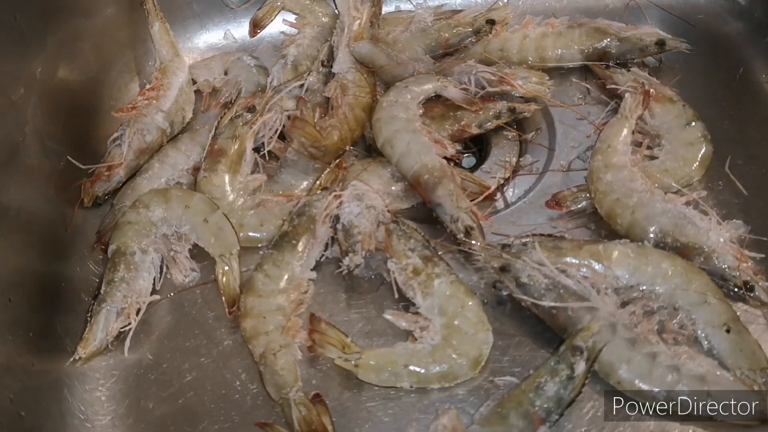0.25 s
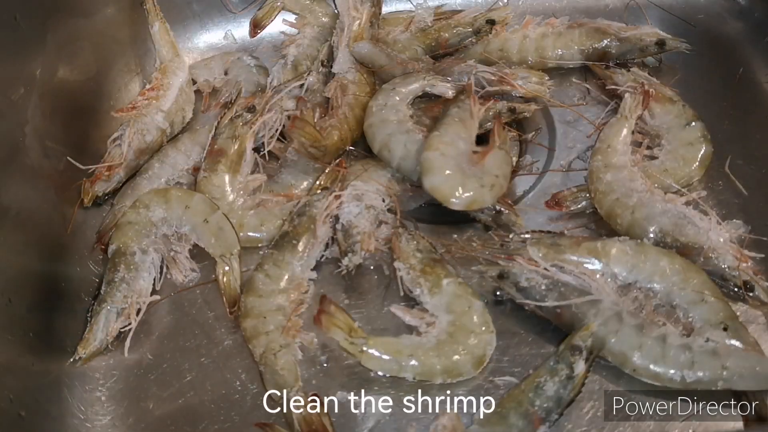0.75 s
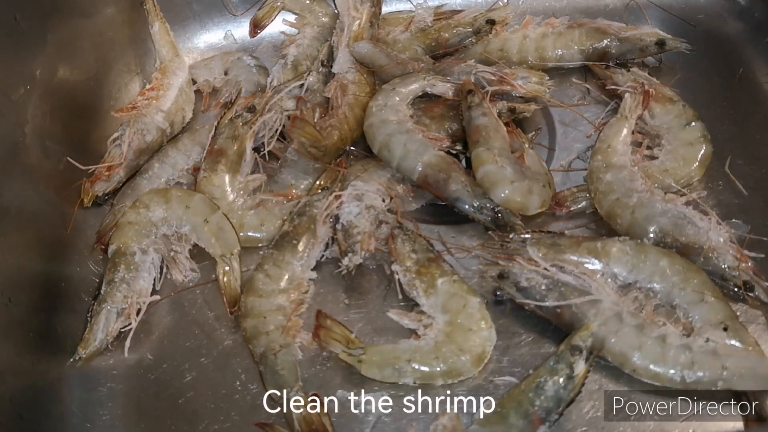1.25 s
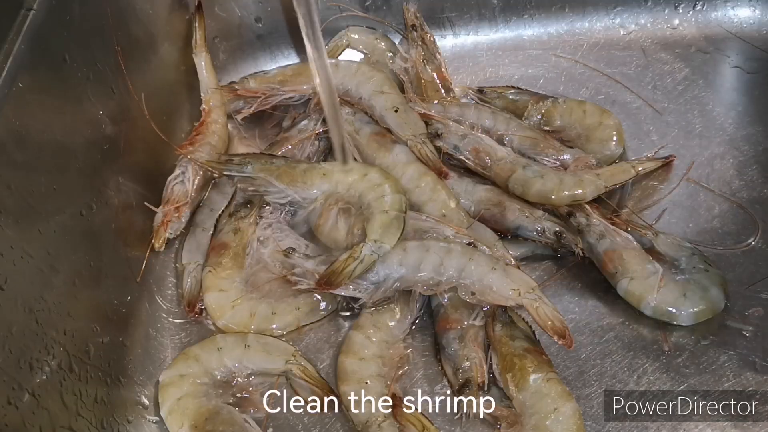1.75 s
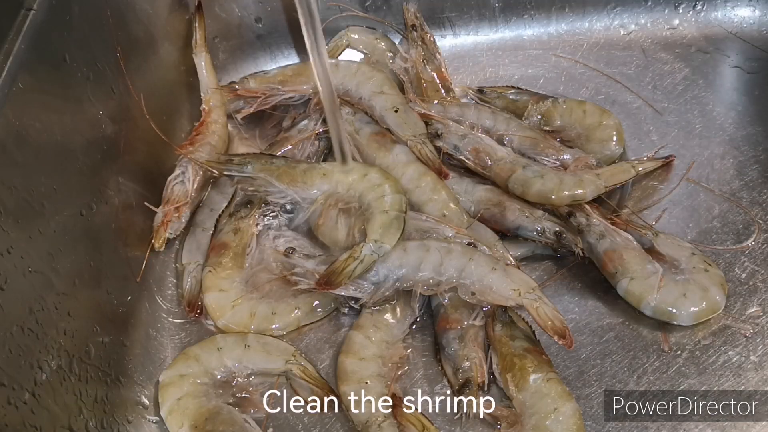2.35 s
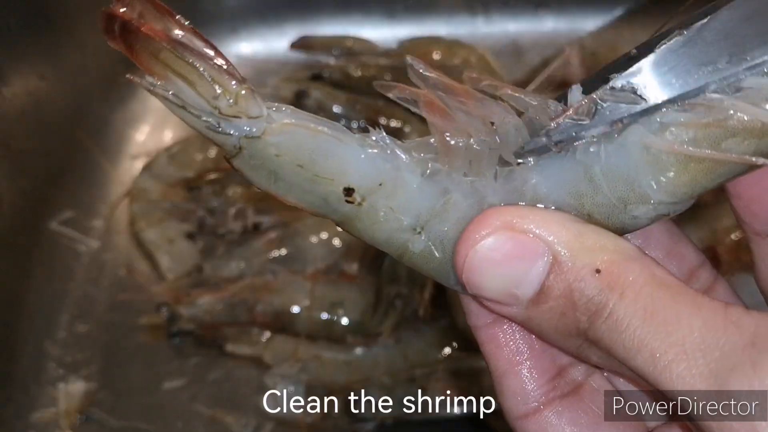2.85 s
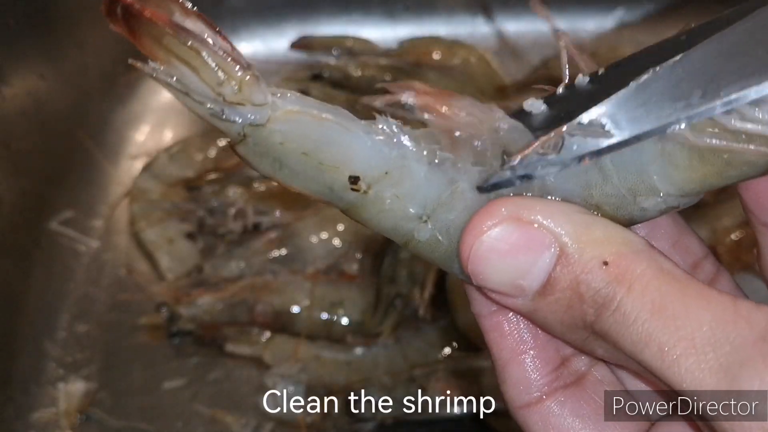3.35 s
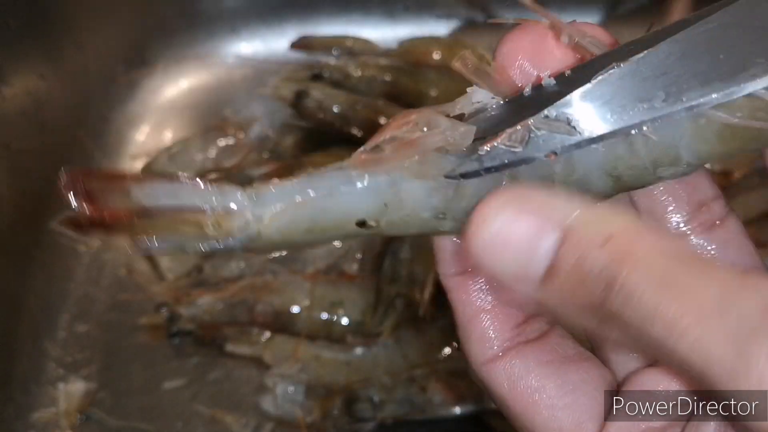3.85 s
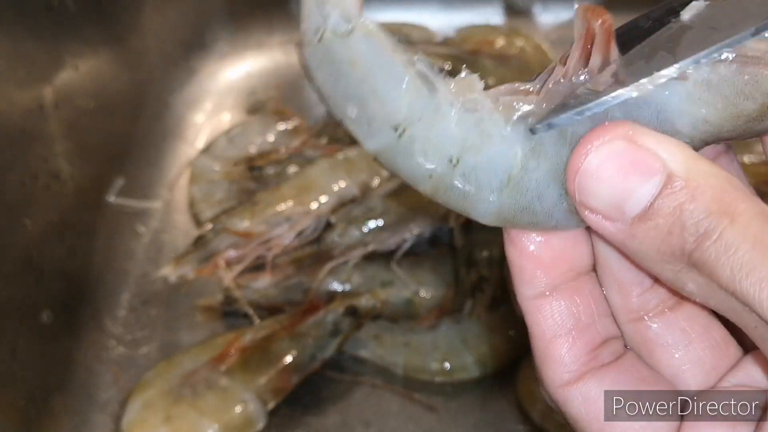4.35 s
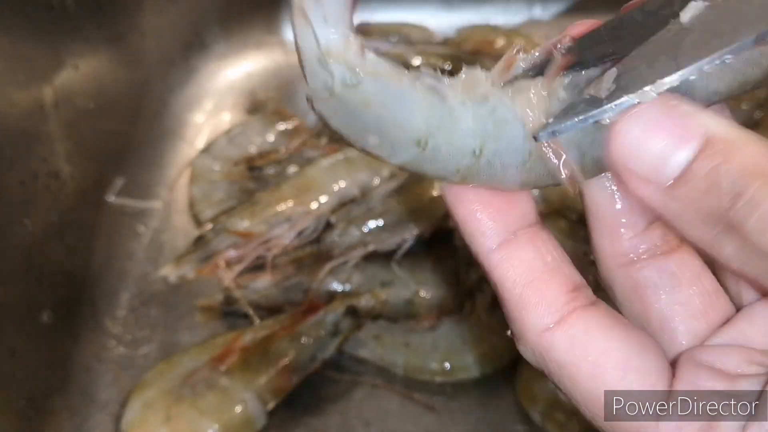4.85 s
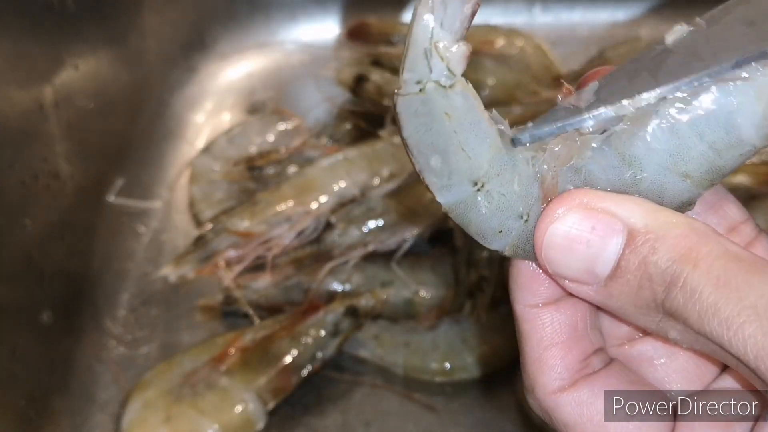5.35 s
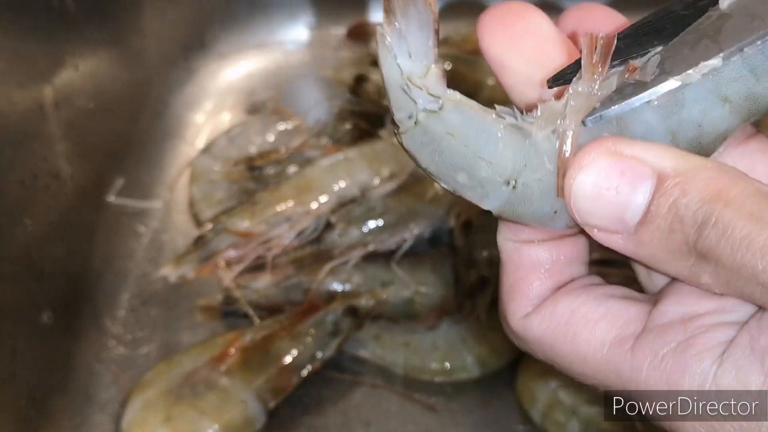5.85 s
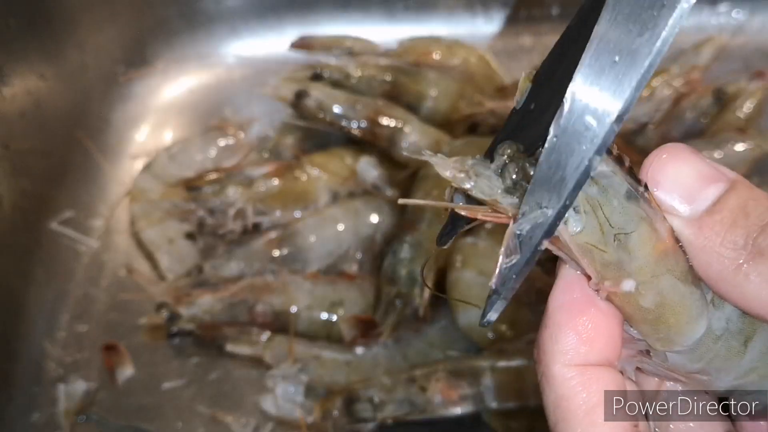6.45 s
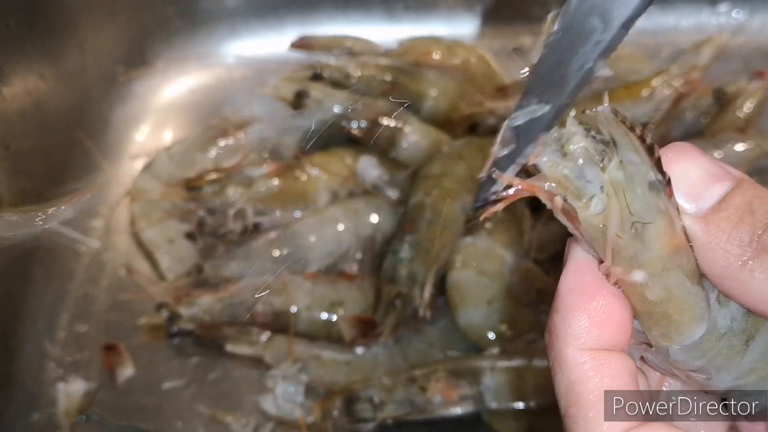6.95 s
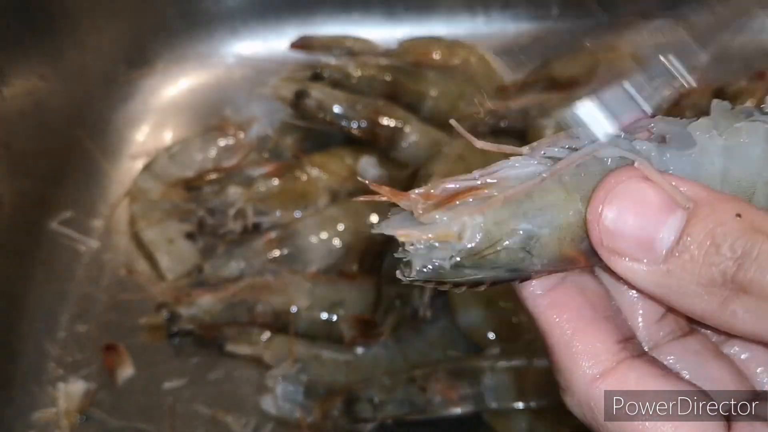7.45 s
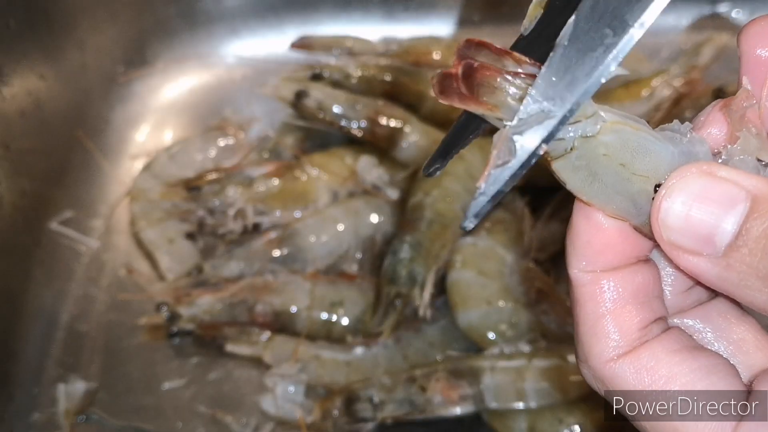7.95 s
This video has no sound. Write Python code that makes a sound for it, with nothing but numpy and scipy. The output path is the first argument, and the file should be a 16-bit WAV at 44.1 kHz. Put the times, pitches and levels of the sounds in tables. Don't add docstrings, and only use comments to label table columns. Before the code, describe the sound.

Close stereo sound at a steel basin: crisp wet scrabbling, a loud hollow flop, a few drips and renewed rustling. Then a steady bright rush of running water with bubbling and low drumming, stopping suddenly. Afterwards, over a faint hum and motor drone, come isolated hard scissor cuts, small crackles and light ticks, the last cut bright and loud, followed by scraps dropping softly.

```python
import sys
import numpy as np
from scipy import signal
from scipy.fft import rfft, irfft, next_fast_len
from scipy.io import wavfile

SR = 44100
rng = np.random.default_rng(int(sys.argv[2]) if len(sys.argv) > 2 else 0)


def put_to_file(sound):
    columns = np.atleast_2d(sound).T
    safe = np.clip(columns, -1, 1)
    whole_steps = np.round(safe * 32767)
    wavfile.write(sys.argv[1], SR, whole_steps.astype(np.int16))


def rack_gain(trim_db):
    fader = np.asarray(trim_db, float)
    return 10 ** (fader / 20)


N = 361179


def rms_one(x):
    return x / np.sqrt(np.mean(x ** 2) + 1e-20)


def level(x):
    return x / np.sqrt(np.mean(x.mean(axis=0) ** 2) + 1e-20)


def in_time(rows):
    s, *columns = np.transpose(rows)
    t = np.arange(N) / SR
    gate = (t >= s[0]) & (t < s[-1])
    return [np.interp(t, s, column) for column in columns] + [gate]


def at_hz(points, hz):
    points = np.array(points)
    return np.interp(np.log(hz), np.log(points[:, 0]), points[:, 1])


def colour(x, spectrum, pan=((1, 0), (2, 0))):
    length = x.shape[-1]
    size = next_fast_len(length)
    hz = np.fft.rfftfreq(size, 1 / SR) + 1
    gain_db = at_hz(spectrum, hz) + at_hz(pan, hz) * [[.5], [-.5]]
    return irfft(rfft(x, size) * rack_gain(gain_db), size)[:, :length]


def drift(rate_hz):
    r = np.exp(-2 * np.pi * rate_hz * 40 / SR)
    white = rng.standard_normal(N // 40 + 2002)
    slow = signal.lfilter([1], [1, -2 * r, r * r], white)[2000:]
    return np.interp(np.arange(N) / 40, np.arange(len(slow)), rms_one(slow))


def resonate(x, hz, width_hz):
    r = np.exp(-np.pi * width_hz / SR)
    ring = [1, -2 * r * np.cos(2 * np.pi * hz / SR), r * r]
    return signal.lfilter(np.array([1, 0, -1]) * (1 - r * r) / 2, ring, x)


def room_noise(least_alike=-.99, left_lag=0):
    # pitch in Hz, likeness of left and right (1 = the same).
    likeness = [(60, 1), (130, 0.98), (290, 0.98), (640, -0.19), (1410, 0.21), (3100, -0.045),
                (6820, -0.19), (15000, -0.04)]
    size = next_fast_len(N)
    alike = np.clip(at_hz(likeness, np.fft.rfftfreq(size, 1 / SR) + 1), least_alike, .999)
    mid, side = rfft(rng.standard_normal((2, size)))
    spectra = np.sqrt(1 + alike) * mid + np.sqrt(1 - alike) * side * [[1], [-1]]
    left, right = irfft(spectra, size)[:, :N]
    return np.array([np.roll(left, left_lag), right])


def grains(per_s, spread_db, length_s, left_lag=-21):
    sizes = rack_gain(spread_db * np.minimum(rng.exponential(1, N), 5))
    starts = sizes * (rng.random(N) < per_s / SR)
    r = np.exp(-1 / (length_s * SR))
    envelope = signal.lfilter([1], [1, -r], starts + 1e-18)
    return envelope * room_noise(least_alike=0.053, left_lag=left_lag)


def kitchen():
    # start in seconds, hum in dB, distant roar in dB, air hiss in dB.
    shots = [
        (0, -68, -67, -65),
        (1.493, -50.5, -65.5, -74),
        (2.84, -55, -70.5, -70.5),
        (4.10, -66, -67, -70.5),
        (6.287, -54.5, -68.5, -70.5),
        (7.636, -55, -64.5, -71),
    ]
    # pitch in Hz, level in dB.
    drones = [
        [(60, -51.5), (120, -80.5)],
        [(270, -59.5), (400, -64), (790, -67)],
        [(138, -60.5), (300, -64.5), (330, -69), (385, -73.5), (490, -75), (525, -83), (700, -89)],
        [(355, -69), (420, -80.5)],
        [(108, -59.5), (320, -65.5), (385, -70.5), (490, -75), (520, -80), (720, -87)],
        [(97, -57.5), (350, -64.5), (410, -70), (535, -77), (755, -85.5)],
    ]
    # pitch in Hz, level in dB per Hz.
    hum_colour = [(12, -51.5), (20, 1.5), (22, -7.5), (54, 1.5), (135, -2), (232, -15.5), (341, -23.5),
                  (433, -28.5), (900, -42), (1170, -78), (1980, -120)]
    # pitch in Hz, level in dB per Hz.
    air_colour = [(410, -34), (700, -7), (757, -13.5), (819, -12.5), (1010, -14), (1870, -4.5), (2300, -8),
                  (3370, -5), (8210, -14), (15200, -16.5), (16000, -12)]
    starts, hum_db, roar_db, air_db = np.transpose(shots)
    shot = np.searchsorted(starts, np.arange(N) / SR, "right") - 1
    out = level(colour(room_noise(), hum_colour)) * rack_gain(hum_db[shot] + drift(21.0))
    roar = resonate(resonate(room_noise(), 160, 330), 160, 330)
    out += level(resonate(roar, 210, 370)) * rack_gain(roar_db[shot])
    white = room_noise()
    for k, lines in enumerate(drones):
        here = shot == k
        for hz, db in lines:
            out[:, here] += rack_gain(db) * level(resonate(resonate(white[:, here], hz, 13), hz, 50))
    return out + level(colour(room_noise(), air_colour)) * rack_gain(air_db[shot])


def basin(push, favoured_hz, spread_db):
    # pitch in Hz, level in dB, seconds to fade by 60 dB, right side against left.
    modes = [(57.4, -3, 0.09, 0.98), (113, 2.5, 0.044, 0.99), (150, -12.5, 0.085, 0.86),
             (190, -8, 0.18, 0.34), (210, -14, 0.55, 1), (290, -6, 0.15, 0.56), (432, -4.5, 0.069, 0.071),
             (561, 5.5, 0.044, 0.05), (1020, -22.5, 0.044, 0.93), (1190, 10, 0.034, 1)]
    out = 0
    for hz, db, t60, right in modes:
        r, w = rack_gain(-60 / (min(t60, .3) * SR)), 2 * np.pi * hz / SR
        mode = signal.lfilter([0, np.sin(w)], [1, -2 * r * np.cos(w), r * r], push)
        mode_db = db - spread_db * abs(np.log2(hz / favoured_hz))
        out = out + mode * rack_gain(mode_db) * np.array([[1], [right]])
    return out


def wriggle():
    # time in seconds, effort as rustle level in dB.
    bouts = [
        [(0.0, -33), (0.052, -29.5), (0.154, -28), (0.264, -35.5), (0.34, -30.5), (0.547, -33.5), (0.554, -31),
         (0.602, -40)],
        [(0.655, -41), (0.668, -25.5), (0.734, -48.5), (0.846, -46), (1.024, -66), (1.125, -55)],
        [(1.145, -39.5), (1.257, -35), (1.267, -29.5), (1.297, -34.5), (1.488, -36)],
    ]
    # pitch in Hz, level in dB per Hz.
    rustle = [(260, -45.5), (450, -24.5), (572, -12.5), (635, -23.5), (1040, -4), (1950, 1.5), (2100, 3),
              (4630, -3), (7810, 0.5), (12000, -16.5), (14400, -17), (15300, -26.5), (16000, -67)]
    # pitch in Hz, left against right in dB.
    rustle_pan = [(60, 8.5), (110, -6), (200, 22.5), (380, -10.5), (700, 11.5), (1290, 0), (2380, 4.5),
                  (4400, 3), (8120, 8.5), (15000, -8.5)]
    effort_db, gate = in_time(np.concatenate(bouts))
    t = np.arange(N) / SR
    flip_s, flip_db, fade_db_per_s = .672, -14, 184.5
    rocking_db, rocking_end_s, stop_db_per_s = -27.5, 0.894, 338
    rocking_db = rocking_db - stop_db_per_s * np.maximum(t - rocking_end_s, 0)
    blow_db = flip_db - fade_db_per_s * abs(t - flip_s)
    flip = (t > flip_s) * rack_gain(np.maximum(blow_db, rocking_db))
    fizz = level(colour(grains(6300, spread_db=1.5, length_s=0.0019), rustle, rustle_pan))
    top = signal.sosfilt(signal.butter(2, 5000, "high", fs=SR, output="sos"), fizz)
    fizz = fizz + top * (rack_gain(2.0) - 1)
    rumble = level(basin(rng.standard_normal(N), 100, spread_db=9.0))
    shifting = rack_gain(-49.5 + 0.55 * (effort_db + 38.5))
    return gate * (rack_gain(effort_db + .5 * drift(25)) * fizz + (shifting + flip) * rumble)


def thuds():
    # time in seconds, peak in dB, favoured pitch in Hz, spread over tones in dB per octave.
    landings = [(0.5514, -23, 308, 26), (0.664, -9.5, 150, 23), (0.6705, -3, 150, 7), (.680, -9, 113, 2),
                (0.698, -38, 100, 6.5), (0.713, -23, 190, 17), (0.7591, -10.5, 121, 8), (0.8, -16, 180, 28),
                (0.818, -19.5, 404, 26), (0.847, -21.5, 190, 5), (0.874, -21.5, 113, 5),
                (1.142, -39.5, 290, 12)]
    out = np.zeros((2, N))
    push = resonate(resonate(signal.unit_impulse(SR // 2), 73, 240), 250, 680)
    for s, db, favoured_hz, spread_db in landings:
        boom = basin(push, favoured_hz, spread_db)
        i = round(s * SR)
        out[:, i:i + len(push)] -= rack_gain(db) * boom / np.abs(boom).max()
    return out


def cracks(events, focus, t60, spectrum, rise_s=0.00028, spike=0, left_lag=20, tail_focus=0.12):
    # pitch in Hz, level in dB per Hz.
    echo_colour = [(530, -55), (1160, -30), (1750, -25), (2290, -9), (3260, -2), (4600, -5), (7100, -7.5),
                   (11400, -10), (14900, -14.5), (16000, -28.5)]
    size, lead = 16384, 512
    out = np.zeros((2, N + size))
    t = np.maximum(np.arange(size) - lead, 0) / SR
    noise = rng.standard_normal((len(events), 5, size))
    snap = rack_gain(-60 * t / t60) * np.minimum(t / rise_s, 1)
    snap = snap + spike * rack_gain(-60 * t / 0.0011) * (t > 0)
    build_up = np.minimum(t / .003, 1)
    give = rack_gain(-60 * t / 0.012) * np.minimum(t / 0.0033, 1)
    echo_rms = colour(noise[0, 3:], echo_colour).std()
    for (s, db, pan_db, hz, echo_db, knock_db), white in zip(events, noise):
        narrow = np.clip(focus - 0.0079 * db, 0, .9)
        direct = white[2] * snap
        scattered = white[:2] * snap
        burst = colour(scattered + [np.roll(direct, left_lag), direct], spectrum)
        burst = (1 - narrow) * burst + narrow * 3 * resonate(burst, hz, 0.21 * hz)
        burst = burst / np.abs(burst).max(axis=1).mean() * 1.4 * rack_gain([[pan_db / 2], [-pan_db / 2]])
        stretch = 1 + 1.8 * rack_gain(min(db, 0))
        answer = (rack_gain(12.5 - 60 * t / 0.019) + rack_gain(-60 * t / (0.12 * stretch))) * build_up
        settling = np.minimum(rack_gain(2.2 * white[2, ::64].repeat(64)), 1.5)
        tail = colour(white[3:] * answer * settling, echo_colour) / echo_rms
        kept = min(tail_focus, 1) * narrow
        tail = (1 - kept) * tail + kept * 3 * resonate(tail, hz, 0.21 * hz)
        knock = resonate(resonate(white[2] * give, 360, 760), 360, 900)
        knock = rack_gain(knock_db - 3.5) * knock / np.abs(knock).max()
        i = round(s * SR) - lead
        out[:, i:i + size] += rack_gain(db) * (burst + rack_gain(echo_db) * tail + knock)
    return out[:, :N]


def splashes():
    # time in seconds, peak in dB, left against right in dB, centre in Hz, low knock in dB.
    slap_events = [(0.345, -28.5, 3, 1100, 0), (0.432, -26.5, 1.5, 2240, -15),
                   (0.5508, -18.5, 9.5, 1970, -4.5), (0.553, -11.5, 9, 3250, -11),
                   (0.5525, -20.5, 7, 950, -10.5), (0.5545, -22.5, 6, 4400, -11.5),
                   (0.552, -19, 5.5, 1700, -11.5), (0.5553, -17, 11, 2530, -7.5),
                   (0.562, -16.5, 7.5, 2600, -7.5), (0.6632, -14.5, 10.5, 7740, -21),
                   (0.6638, -19, 9, 5400, -19), (0.669, -17.5, 5, 7700, -8.5),
                   (0.6745, -17, 3.5, 7500, -6.5), (0.676, -22.5, 2.5, 2000, -4.5),
                   (0.679, -18, 5, 5500, -8.5), (0.697, -31.5, 3.5, 1950, -11), (0.76, -41, -1.5, 1600, 18),
                   (0.7827, -33.5, 16, 2330, 9), (0.8205, -44, 2, 1200, 14), (0.849, -35, 18, 1850, 4),
                   (1.149, -31, 8, 1900, -14), (1.156, -31, 8, 1900, -12), (1.1435, -32, 11, 2557, -4)]
    # time in seconds, peak in dB, left against right in dB, centre in Hz.
    drip_events = [
        (0.917, -34.5, 7, 7600),
        (0.952, -44, 11, 6900),
        (0.9816, -40.5, 7, 8000),
        (1.044, -47, -3, 8300),
        (1.077, -43, 7, 2940),
        (1.1049, -43, 3.5, 4620),
        (1.1293, -39, 5, 7300),
        (1.261, -28, 10, 2500),
    ]
    # pitch in Hz, level in dB per Hz.
    wet = [(500, -30), (1000, -10.5), (2000, -1), (3500, -4.5), (5500, -8.5), (7800, -4), (10500, -14.5),
           (16000, -24.5)]
    slap_echo_db, drip_echo_db, drip_knock_db = -33, -19.5, -32
    slaps = [(*row[:4], slap_echo_db, row[4]) for row in slap_events]
    drips = [(*row, drip_echo_db, drip_knock_db) for row in drip_events]
    return cracks(slaps + drips, focus=0.5, t60=0.009, spectrum=wet, left_lag=-22)


def bubbles(size):
    per_s, cycles, pitches = 220, 60, 24
    born = rack_gain(5 * np.minimum(rng.exponential(1, size), 3)) * (rng.random(size) < per_s / SR)
    dealt = rng.integers(0, pitches, size)
    lean = rack_gain(rng.normal(4.4, 3.2, pitches))
    out = 0
    for k, hz in enumerate(np.geomspace(1500, 4200, pitches)):
        ring = resonate(born * (dealt == k) + 1e-18, hz, 0.92 * hz / cycles)
        out = out + ring * [[lean[k]], [1]]
    return rack_gain(-49) * level(out)


def gulps():
    # time in seconds, level in dB, pitch in Hz.
    large_bubbles = [
        (1.685, -36, 1330),
        (2.425, -35, 1620),
        (2.76, -36, 1620),
        (1.78, -36, 2900),
    ]
    out, t = np.zeros(N), np.arange(8192) / SR
    for s, db, hz in large_bubbles:
        swell = rack_gain(db - 60 * t / 0.094) * np.minimum(t / 0.0068, 1)
        out[round(s * SR):][:len(t)] += swell * np.sin(2 * np.pi * hz * t)
    return out * rack_gain([[2.0], [-2.0]])


def tap():
    # pitch in Hz, level in dB per Hz.
    stream = [(130, -19.5), (220, -10.5), (278, -4), (344, -20), (398, -11.5), (493, -14.5), (786, -12),
              (958, -19), (2570, 1), (4990, -3.5), (5500, -6.5), (6500, -5), (8390, -7), (11000, 1),
              (12000, -7), (16000, -21)]
    # pitch in Hz, left against right in dB.
    stream_pan = [(60, 2), (110, -18), (200, -2), (380, 1), (700, 4.5), (1290, 0.5), (2380, 4.5),
                  (4400, -0.5), (8120, 7.5), (15000, 5)]
    # pitch in Hz, width in Hz, level in dB.
    whistles = [(10700, 70, -53), (10975, 90, -47.5), (11270, 100, -44.5), (5990, 80, -58),
                (2580, 170, -52), (2960, 120, -52), (9910, 70, -57), (4870, 90, -57), (1965, 50, -57),
                (10350, 70, -58)]
    # time in seconds, peak in dB.
    surge_events = [
        (1.522, -43),
        (1.998, -25.5),
        (2.262, -40),
        (2.46, -43),
        (2.788, -38.5),
    ]
    from_s, to_s = 1.49, 2.838
    rise_db_per_s, fall_db_per_s = 241, 253
    out, run = np.zeros((2, N)), slice(round(from_s * SR), round(to_s * SR))
    t = np.arange(N)[run] / SR
    surges = [db - np.where(t < s, rise_db_per_s, fall_db_per_s) * abs(t - s) for s, db in surge_events]
    drum_db = np.maximum(np.max(surges, axis=0), -50 + 3.3 * drift(9.1)[run])
    splash = level(colour(grains(6000, spread_db=-8.5, length_s=0.012), stream, stream_pan))
    splash = (splash * rack_gain(-35 + .9 * drift(14.4)))[:, run]
    air = room_noise()[:, run]
    for hz, width_hz, db in whistles:
        whistle = resonate(resonate(air, hz, width_hz), hz, 0.61 * width_hz)
        splash = splash + rack_gain(db + 2.9 * drift(9.8)[run]) * level(whistle) * rack_gain([[2.5], [-2.5]])
    drum = resonate(resonate(rng.standard_normal(len(t)), 162, 20), 162, 98)
    out[:, run] = splash + bubbles(len(t)) + rack_gain(drum_db) * rms_one(drum)
    return out


def crunch():
    # start in seconds, end in seconds, first level in dB, last level in dB.
    squeezes = [(2.991, 3.037, -46, -68.5), (3.048, 3.066, -59, -57), (3.062, 3.082, -45.5, -60),
                (3.24, 3.26, -66, -77.5), (3.684, 3.711, -59.5, -55), (3.707, 3.727, -62.5, -26.5),
                (4.498, 4.588, -74, -63), (4.593, 4.621, -54, -20), (5.917, 6.09, -71.5, -76),
                (6.094, 6.124, -67, -72), (6.134, 6.177, -68.5, -51), (6.253, 6.287, -73, -57),
                (6.98, 7.06, -43.5, -53.5), (7.07, 7.08, -40.5, -15.5), (7.198, 7.23, -57, -52),
                (7.232, 7.28, -64, -55.5)]
    # pitch in Hz, level in dB per Hz.
    grit_colour = [(710, -48), (1200, -39.5), (2480, -1.5), (2830, 0), (5470, -1), (6580, -7.5), (12500, 1),
                   (16000, 0)]
    grit = level(colour(grains(2500, spread_db=2.5, length_s=.002, left_lag=20), grit_colour))
    grit = grit * rack_gain([[1.5], [-1.5]])
    pressure = np.zeros(N)
    for start, end, first_db, last_db in squeezes:
        i, j = round(start * SR), round(end * SR)
        pressure[i:j] += rack_gain(np.linspace(first_db, last_db, j - i) - 3.0)
    return grit * pressure


def shell_breaks():
    # time in seconds, peak in dB, left against right in dB, centre in Hz, echo in dB.
    snap_events = [(3.0817, -33.5, -9, 2860, -20), (3.7122, -26, 8, 8960, -27), (3.72, -12.5, 6, 2800, -17),
                   (3.725, -22.5, -1.5, 5060, -19), (4.596, -30, 1.5, 12700, -26.5),
                   (4.599, -38, 1.5, 4600, -24), (4.606, -37, 0, 3350, -15.5), (4.616, -15, 3, 4300, -17),
                   (5.474, -24, 6, 4200, -13.5), (6.1775, -16, 4, 4300, -17),
                   (6.6907, -32.5, 10, 14140, -18.5), (7.047, -31.5, 7, 13400, -16.5),
                   (7.0726, -24, 5, 12130, -25.5), (7.0785, -3, 3, 11500, -23)]
    # time in seconds, peak in dB, left against right in dB, centre in Hz.
    splinter_events = [(2.9722, -39, 6, 13160), (2.993, -47, -10, 3730), (2.9982, -41, 9, 12000),
                       (3.004, -44.5, 6, 12000), (3.04, -47, 5, 11600), (3.063, -49, 7, 11570),
                       (3.212, -46, 9, 11400), (3.2312, -45.5, 22, 12200), (3.319, -58, 6, 11500),
                       (3.43, -57, 5, 9500), (3.481, -61, 3, 7000), (3.49, -61, 3, 6000),
                       (3.325, -51.5, 12, 12200), (3.3324, -54, 12, 12400), (3.5167, -57.5, 5.5, 14000),
                       (3.652, -56, 6.5, 12310), (4.445, -59.5, 2, 4300), (4.4709, -61.5, 0, 9000),
                       (4.5198, -58, 2, 14550), (4.5323, -56.5, 4, 14930), (4.5443, -54, 5, 14500),
                       (4.5692, -52, 4.5, 15100), (4.7593, -55, 0, 13200), (4.768, -54, 3, 13240),
                       (5.0511, -60.5, 1, 11900), (5.578, -62.5, 0, 13000), (5.586, -57.5, 1.5, 13600),
                       (5.593, -54, 1, 13000), (5.601, -54, -2.5, 12500), (5.9294, -59, 5.5, 13700),
                       (5.9995, -52.5, 12, 14500), (6.0972, -45, 6, 15000), (6.1012, -41, 5, 15000),
                       (6.1063, -46.5, 1, 7000), (6.1485, -50, 7, 14400), (6.1614, -38.5, 6, 14000),
                       (6.166, -42, 5.5, 14000), (6.172, -40, 6, 14500), (6.397, -58.5, 5.5, 13000),
                       (6.442, -53, 7.5, 12800), (6.607, -56, 4, 12000), (6.8927, -44.5, 10, 12100),
                       (6.9044, -56, 10, 11800), (6.955, -47, 12, 11700), (6.9714, -43, 1, 8400),
                       (6.981, -50, 1, 11640), (6.991, -40, 6, 12600), (7.005, -37.5, 9.5, 12970),
                       (7.02, -45, -7, 4245), (8.0467, -43, 7.5, 14000)]
    # time in seconds, peak in dB, left against right in dB, centre in Hz, low knock in dB.
    tap_events = [(2.8514, -65, -8, 4950, 3), (3.159, -55, 3, 4520, -13), (3.4384, -51.5, 2, 5100, -15),
                  (3.471, -53, -3, 2730, -7), (3.5437, -59, 13, 9000, -21), (4.0994, -66, 1, 3230, 8),
                  (4.8295, -36.5, 11, 14200, -7.5), (4.834, -48, 9, 4300, -1), (6.0357, -55, 6, 1790, -25),
                  (7.6368, -66.5, 1.5, 2030, 14), (8.0344, -55.5, 1, 4560, -12)]
    scrap_events = [
        (7.195, -33.5, 5, 12100, -10),
        (7.203, -42, 9, 900, -3),
        (7.211, -44, 6, 1910, 1),
        (7.2186, -30, 4.5, 2100, -29),
        (7.2224, -39, 6, 4000, -13),
        (7.228, -43, 4.5, 2100, -5),
        (7.241, -48, 4.5, 1500, -2),
    ]
    # pitch in Hz, level in dB per Hz.
    shell = [(530, -49), (900, -19.5), (1590, -18), (2300, -7.5), (3230, 1), (6110, -2.5), (6970, -2),
             (10900, -2), (14700, -5), (16000, -9)]
    # pitch in Hz, level in dB per Hz.
    flesh = [(200, -3), (650, -1), (1200, -4), (2100, -2), (5000, -1), (11000, -6), (16000, -6)]
    tap_echo_db, splinter_echo_db, splinter_knock_db = -16.5, -17, -23.5
    snaps = [(*row, -52.5 - 0.8 * row[1]) for row in snap_events]
    splinters = [(*row, splinter_echo_db, splinter_knock_db) for row in splinter_events]
    taps = [(*row, tap_echo_db, knock_db) for *row, knock_db in tap_events]
    scraps = [(*row, tap_echo_db - 7.0, knock_db) for *row, knock_db in scrap_events]
    out = cracks(scraps, focus=0.081, t60=0.049, rise_s=0.001, spectrum=flesh)
    out += cracks(snaps + taps, focus=0.27, t60=.008, spike=0.37, spectrum=shell)
    return out + cracks(splinters, focus=.58, t60=.008, tail_focus=0.9, spectrum=shell)


def blades():
    # time in seconds, peak in dB, far side in dB, pitch in Hz, low push in dB.
    clicks = [
        (3.71993, 2, -10, 3700, -54),
        (4.61645, -6, -3, 4400, -50),
        (5.47428, -12, -5, 4500, -48),
        (6.17748, -7, -3, 4400, -50),
        (7.07838, 1, -2, 10500, -29),
    ]
    # pitch in Hz, level in dB, seconds to fade by 60 dB.
    steel_tones = [(2540, -7.5, .02), (3300, -3, .04), (3960, -9, .025), (4400, -6.5, .025),
                   (4980, -1, .04), (5600, -6.5, .03), (6260, -6.5, .02), (8600, -2.5, .02),
                   (10400, -5, .02), (11200, -5.5, .025), (13300, -7, .015)]
    # delay in milliseconds, level in dB.
    mic_paths = [
        [(.16, 0), (.68, -3), (1.08, -1), (1.36, -3), (1.9, -6), (2.35, -8)],
        [(0, 0), (.95, -13), (1.5, -15), (2.1, -15)],
    ]
    out, hit = np.zeros((2, N)), signal.unit_impulse(4096)
    push, t = resonate(hit, 650, 1200), np.arange(len(hit)) / SR
    modes = np.array([rack_gain(db - 60 * t / t60) * np.sin(2 * np.pi * hz * t) for hz, db, t60 in steel_tones])
    uneven = rng.standard_normal((len(clicks), 2, len(steel_tones)))
    edge = resonate(resonate(hit, 9700, 7000), 9700, 7000)
    edge = edge / np.abs(edge).max()
    for (s, db, far_db, hz, push_db), share in zip(clicks, uneven):
        pop = resonate(resonate(hit, hz, 4100), hz, 4100)
        pop = resonate(pop / np.abs(pop).max() + rack_gain(-5.5) * edge, hz, 4 * hz)
        pop = pop / np.abs(pop).max()
        i = round(s * SR)
        puff = rack_gain(push_db) * push / push.max()
        ring = rack_gain(-32.5) * (rack_gain(3.0 * share) @ modes)
        out[:, i:i + len(hit)] += rack_gain(db) * (puff + ring)
        for side, paths in enumerate(mic_paths):
            for ms, path_db in paths:
                j = i + round(ms * SR / 1000)
                out[side, j:j + len(hit)] += rack_gain(db + path_db + far_db * (1.5 - side)) * pop
    return out


def scene():
    shrimp = wriggle() + thuds() + splashes()
    water = tap() + gulps()
    scissors = crunch() + shell_breaks() + blades()
    return kitchen() + shrimp + water + scissors


def thin_treble(x):
    from_hz, band_hz, below_db, chance_db = 9300, 345, -16, 4.5
    hz, _, z = signal.stft(x, SR, nperseg=2048, noverlap=1024)
    power = np.abs(z) ** 2 + 1e-20
    middle = power[:, (hz > 2000) & (hz < 9000)].mean(axis=(0, 1))
    for low in np.arange(from_hz, 16500, band_hz):
        band = (hz >= low) & (hz < low + band_hz)
        margin = rack_gain(below_db + chance_db * rng.standard_normal(len(middle))) ** 2
        weak = power[:, band].mean(axis=(0, 1)) < margin * middle
        z[:, band] *= np.where(weak, .03, 1)
    return signal.istft(z, SR, nperseg=2048, noverlap=1024)[1][:, :N]


def low_pass(x):
    return signal.sosfilt(signal.butter(12, 16510, fs=SR, output="sos"), x)


def record(dry):
    limited = 1.1 * np.tanh(dry / 1.1)
    top_cut = signal.cheby2(16, 50, 16150, fs=SR, output="sos")
    mix = thin_treble(signal.sosfilt(top_cut, limited))
    return low_pass(mix)


dry = scene()
out = record(dry)
put_to_file(out)
```